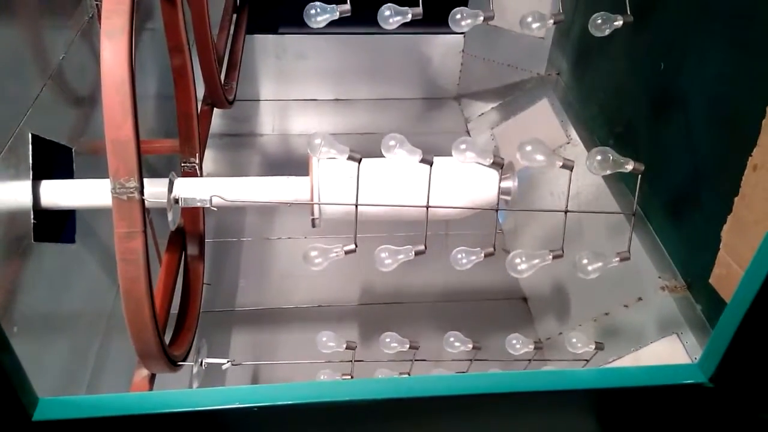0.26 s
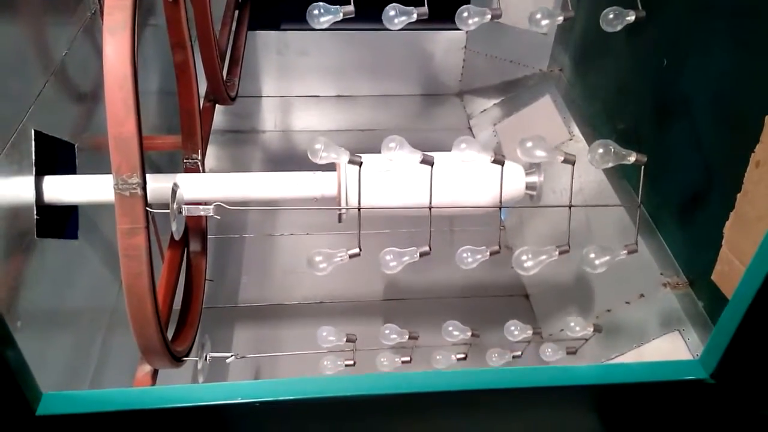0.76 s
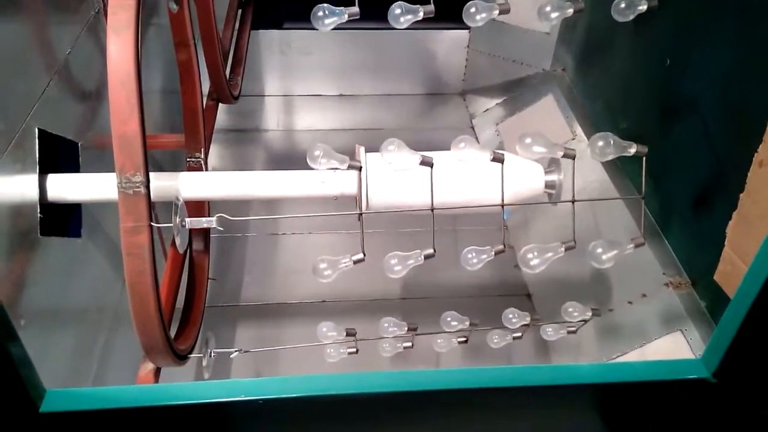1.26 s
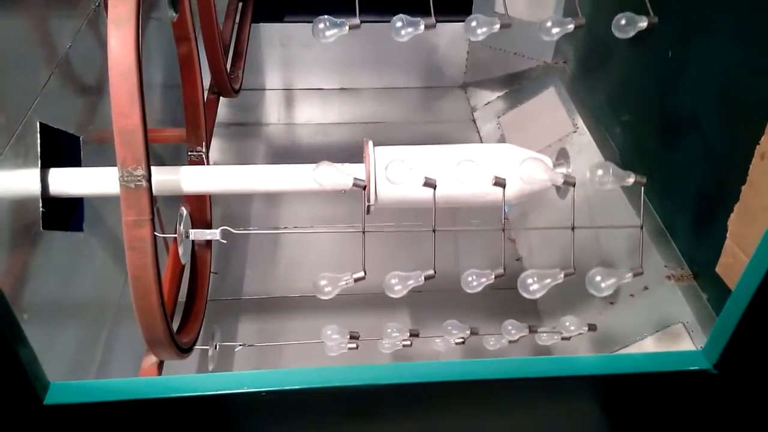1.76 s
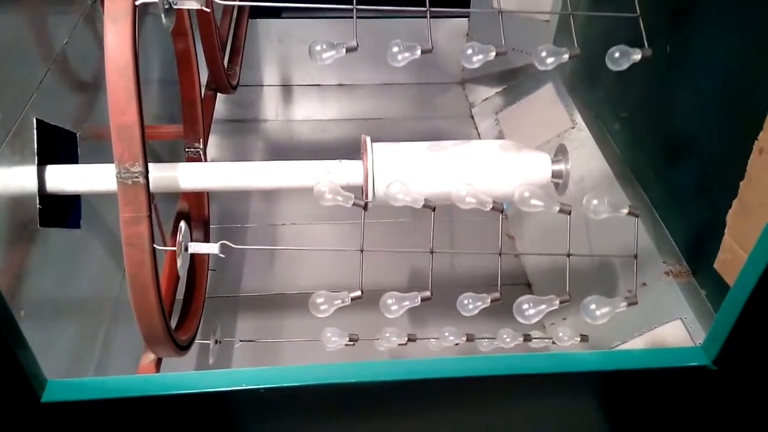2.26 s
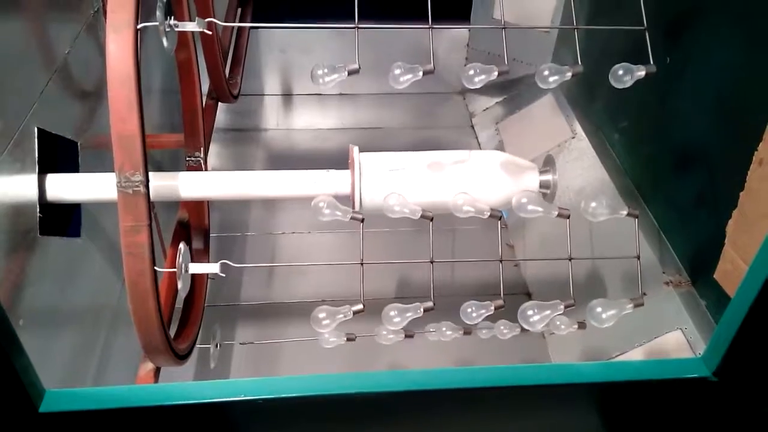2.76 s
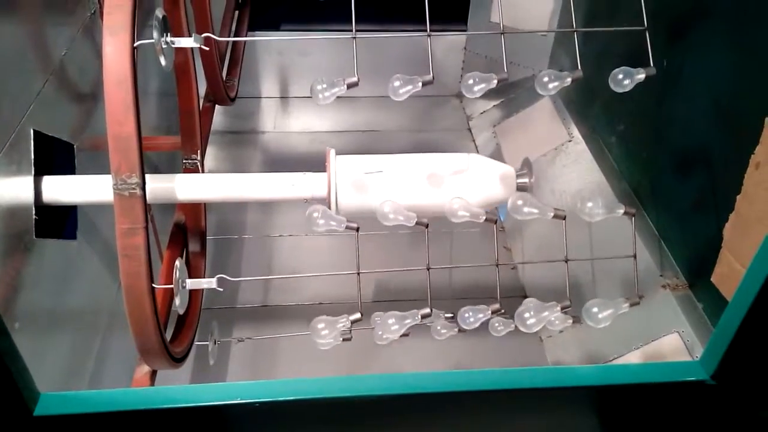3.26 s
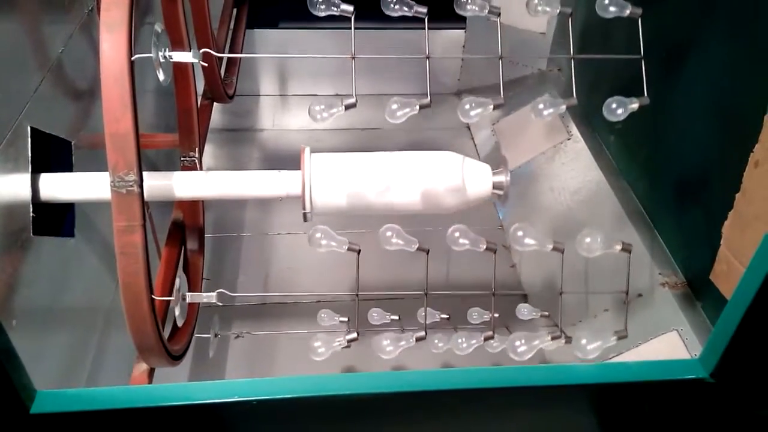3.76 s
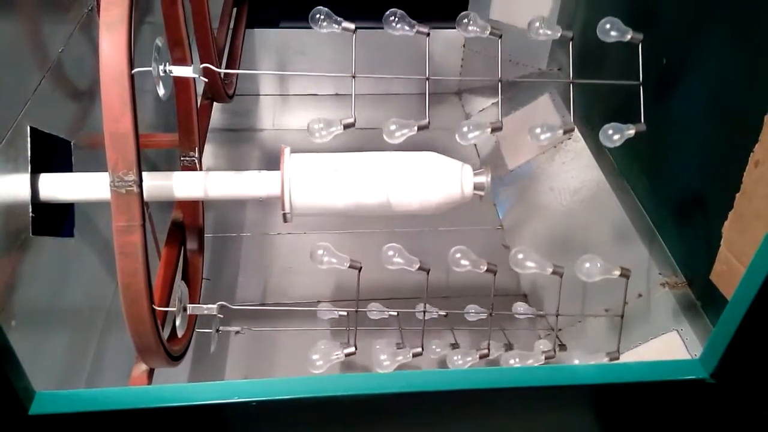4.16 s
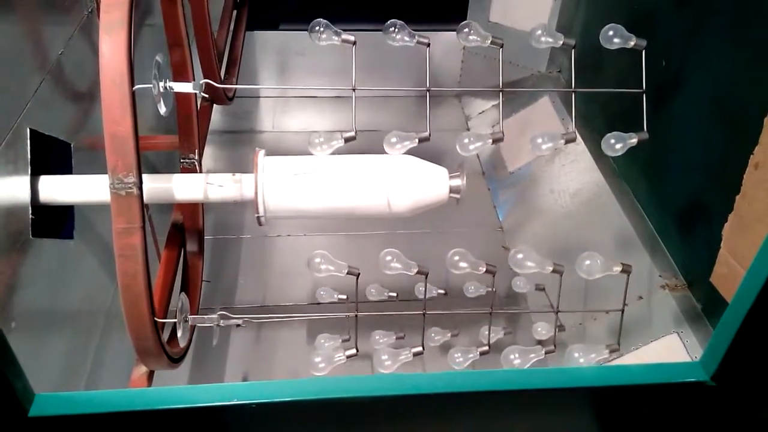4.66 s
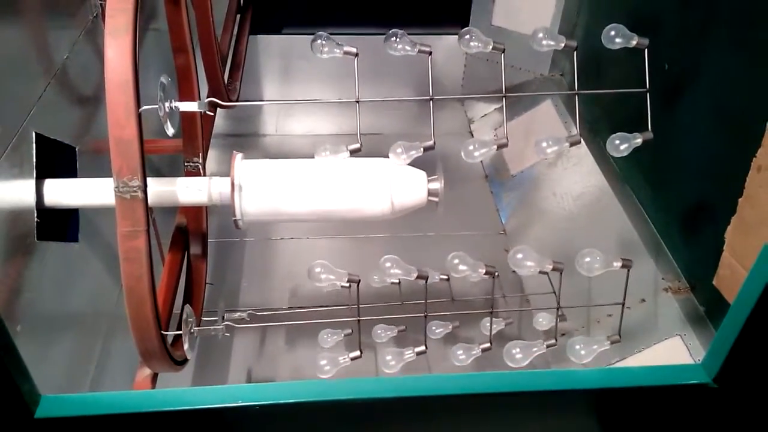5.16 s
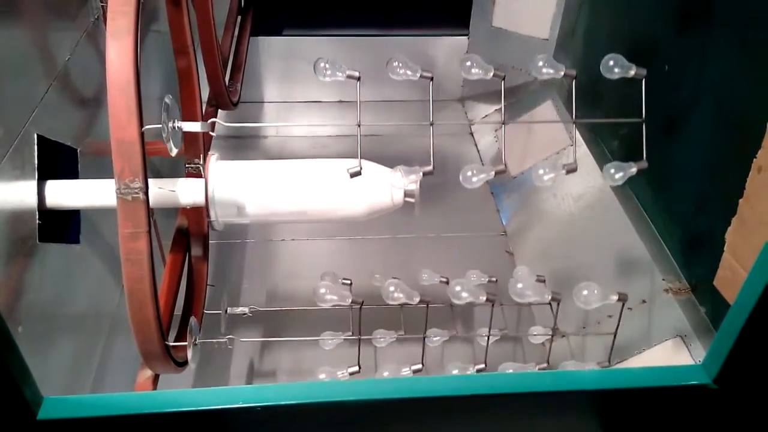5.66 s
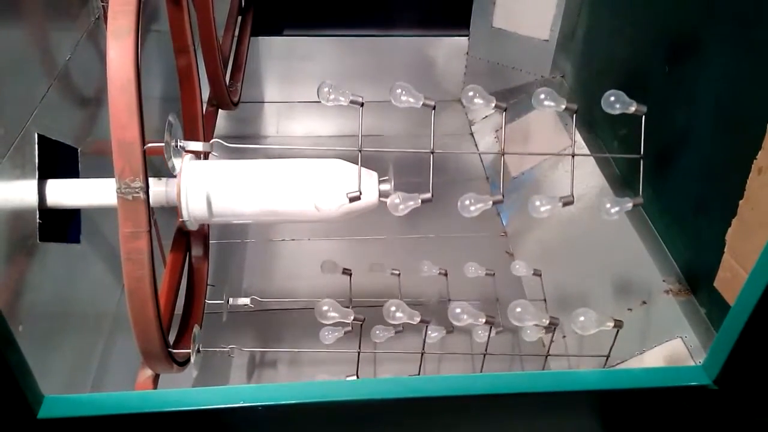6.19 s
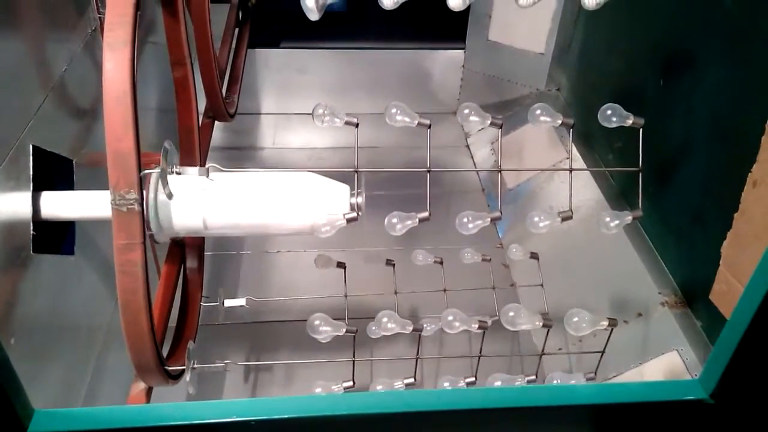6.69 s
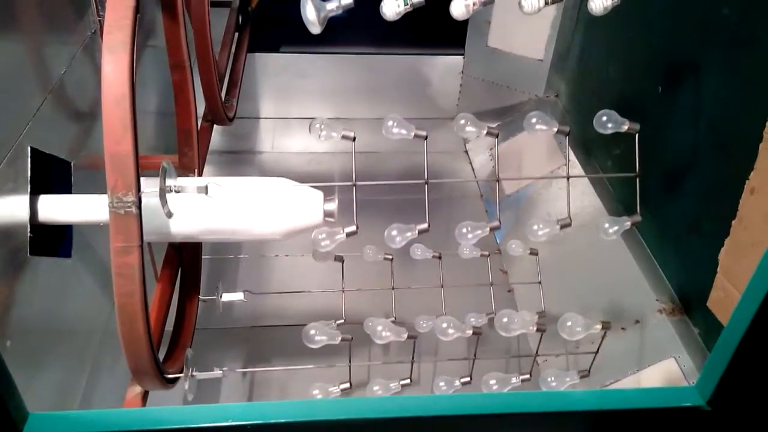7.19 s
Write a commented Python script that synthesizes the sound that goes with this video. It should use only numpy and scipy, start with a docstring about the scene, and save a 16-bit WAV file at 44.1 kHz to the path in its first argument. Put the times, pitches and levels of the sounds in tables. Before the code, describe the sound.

Heard from the opening of a metal paint booth, a dense hiss of spraying air blends with the broad rush and low, hollow drone of the extraction. A high motor whine with a fast flutter runs throughout, and above it the whistling tones of a spinning atomizer shimmer in and out. The noise stays even, with only the whine easing late on and then swelling to the finish.

```python
"""A rotary-bell paint atomizer runs in a sheet-steel spray booth. From the first instant its turbine
sings in high harmonics of the spin rate, a drive motor holds a beating whine, shaping air hisses in
the nozzles' resonances and extraction air rushes through the booth's low modes. Throughout, the
turbine's partials fade and return as reflections off the travelling head interfere with the direct
sound. Near 6 s the whine dips, then rises to its loudest at the end."""
import sys
import numpy as np
from scipy import signal
from scipy.fft import rfft, irfft, next_fast_len
from scipy.io import wavfile

SR = 44100
rng = np.random.default_rng(int(sys.argv[2]) if len(sys.argv) > 2 else 0)


def unload_wav(signal):
    """Save mono or channel-first audio to the path in sys.argv[1] as 16-bit WAV at rate SR, clipped to [-1, 1]."""
    wavfile.write(
        sys.argv[1],
        SR,
        np.round(np.clip(np.atleast_2d(signal).T, -1, 1) * 32767).astype(np.int16),
    )


N = 327663

# slow swell of the high and the low hiss about their means: (time [s], level [dB])
HIGH_HISS_SWELL = [(0.0, -0.1), (1.0, 0.5), (1.8, -0.1), (1.99, 0.7), (2.39, -0.7), (3.39, 0.2),
                   (3.79, -0.5), (4.19, 0.9), (4.39, -0.3), (4.59, 0.7), (4.99, 0.5), (5.19, -0.6),
                   (6.18, 0.1), (6.38, 0.9), (6.78, -0.7), (7.43, -0.3)]
LOW_HISS_SWELL = [(0.0, -1.0), (0.6, 0.1), (1.0, -0.5), (1.6, -0.5), (2.19, 0.3), (2.79, -0.4), (2.99, 0.7),
                  (3.79, -0.3), (4.59, 0.6), (5.39, -0.2), (5.78, 0.4), (7.43, -0.1)]


def from_db(db):
    """Amplitude ratio: tenfold for every 20 dB."""
    return 10 ** (np.asarray(db) / 20)


def in_time(rows):
    """Linear interpolation of (time [s], value) rows at every sample."""
    times, values = np.transpose(rows)
    return np.interp(np.arange(N) / SR, times, values)


def drift(rate):
    """Low-pass Gaussian noise of unit deviation, changing about `rate` times a second."""
    hop, settling_steps = 40, 2000
    pole = np.exp(-2 * np.pi * hop * rate / SR)
    white = rng.standard_normal(N // hop + settling_steps + 2)
    slow = signal.lfilter([1], [1, -2 * pole, pole * pole], white)[settling_steps:]
    return np.interp(np.arange(N) / hop, np.arange(len(slow)), slow / slow.std())


def noise(gain_at):
    """Spectral shaping: white noise takes on the amplitude per root hertz `gain_at(frequency)`."""
    size = next_fast_len(N)
    hz = np.maximum(np.fft.rfftfreq(size, 1 / SR), 1)
    spectrum = rfft(rng.standard_normal(size)) * gain_at(hz)
    return irfft(spectrum, size)[:N] * np.sqrt(SR / 2)


def fading_tone(cycles, echo_share, fades_per_s):
    """Interference: random reflections off moving parts shift the level and phase of a unit-rms sine."""
    echoes = echo_share * (drift(fades_per_s) + 1j * drift(fades_per_s)) / np.sqrt(2)
    direct = np.exp(2j * np.pi * (cycles + rng.random()))
    return np.sqrt(2 / (1 + echo_share ** 2)) * np.real((1 + echoes) * direct)


def turbine(riders_db=0.4, top_db=0.7, top_harmonic=26):
    """Periodic rotation radiates harmonics of one slightly unsteady spin rate; each fades on its own."""
    # speed of the turbine: (time [s], spin rate [turns/s])
    spin = [(0.0, 204.6), (1.2, 204.33), (2.8, 204.35), (3.2, 204.61), (4.0, 204.6), (4.4, 204.42),
            (5.2, 204.38), (5.6, 204.56), (6.4, 204.51), (7.1, 204.92)]
    # two loud partials that ride on the high hiss: (harmonic number, level [dB], swell [dB per dB])
    rider_partials = [(22, -34, 3), (23, -30.5, 4.5)]
    # highest loud partial, strongest while the head reaches furthest in: (time [s], level [dB])
    top_level = [(0.0, -37.7), (0.4, -29.5), (1.4, -27.7), (1.6, -36.1), (1.8, -25.4), (2.59, -30.4),
                 (3.19, -27.0), (3.59, -35.1), (3.79, -29.7), (3.99, -35.9), (4.59, -30.0), (7.43, -32.0)]
    # fainter partials: (harmonic number, level [dB])
    faint_partials = [(11, -41), (12, -36.5), (14, -48), (16, -46.5), (17, -46.5), (19, -35.5), (20, -43),
                      (21, -40), (25, -38), (28, -45), (29, -43), (30, -48), (31, -43), (33, -50),
                      (35, -57)]
    booth_echoes = dict(echo_share=0.6, fades_per_s=3.0)
    turns = np.cumsum(in_time(spin) + 0.04 * drift(4)) / SR
    hiss_db = in_time(HIGH_HISS_SWELL)
    riders = sum(from_db(riders_db + db + swell * hiss_db) * fading_tone(k * turns, **booth_echoes)
                 for k, db, swell in rider_partials)
    top = from_db(top_db + in_time(top_level)) * fading_tone(top_harmonic * turns, **booth_echoes)
    faint = sum(from_db(db) * fading_tone(k * turns, echo_share=0.7, fades_per_s=2.5)
                for k, db in faint_partials)
    return riders + top + faint


def motor(main_db=-0.2):
    """Close tones beat at their difference frequencies, chiefly about 15 and 30 Hz."""
    # the whine's two main tones: (frequency [Hz], relative level [dB])
    main_tones = [(1815.5, 0), (1830.3, -4.5)]
    # envelope of that pair: (time [s], level [dB])
    main_level = [(0.0, -31), (1.0, -31), (2.39, -30), (4.19, -30), (4.59, -29.5), (5.19, -29.8),
                  (5.98, -33), (6.78, -28), (7.43, -27)]
    # weaker tones: (frequency [Hz], level [dB])
    side_tones = [(773.8, -44.5), (1756.0, -36.5), (1785.7, -38), (1845.4, -42)]
    t = np.arange(N) / SR
    main = sum(from_db(db) * fading_tone(hz * t, echo_share=0.25, fades_per_s=2.0)
               for hz, db in main_tones)
    sides = sum(from_db(db) * fading_tone(hz * t, echo_share=0.44, fades_per_s=1.4)
                for hz, db in side_tones)
    return from_db(main_db + in_time(main_level)) * main + sides


def resonances(modes):
    """Broadband turbulence excites steep-sided resonances, whose powers add."""
    scale = 2 * np.sqrt(np.sqrt(2) - 1)  # makes each width a half-power bandwidth

    def gain_at(f):
        peaks = (from_db(db) / (1 + (scale * (f - hz) / width) ** 2) for hz, width, db in modes)
        return np.sqrt(sum(peak ** 2 for peak in peaks))
    return noise(gain_at)


def shaping_air(split_hz=3200, surge=0.99, waver_db=0.22, flutter_db=0.24):
    """Jet turbulence drives the nozzles' resonances; a low and a high band swell, waver and flutter."""
    # nozzle resonances: (frequency [Hz], bandwidth [Hz], spectral density level [dB])
    nozzle_modes = [(1735, 244, -53), (1990, 68, -49.5), (2274, 120, -53), (2286, 336, -48.5),
                    (2373, 50, -46), (3154, 6.3, -54.5), (3700, 20, -55), (3966, 450, -58.5),
                    (4626, 420, -49.5), (4924, 300, -49.5), (5206, 220, -52.5)]
    low = resonances([mode for mode in nozzle_modes if mode[0] < split_hz])
    high = resonances([mode for mode in nozzle_modes if mode[0] >= split_hz])
    hiss = np.zeros(N)
    for band, swell in ((low, LOW_HISS_SWELL), (high, HIGH_HISS_SWELL)):
        level_db = surge * in_time(swell) + waver_db * drift(3.3) + flutter_db * drift(25)
        hiss += band * from_db(level_db)
    return hiss


def extraction_air(rush_surge=0.4, drone_surge=1.7):
    """Turbulent flow makes a broad rush that follows the jet a little, and drives the booth's modes."""
    # rush of air: (frequency [Hz], spectral density level [dB])
    rush_spectrum = [(30, -115), (45, -84), (65, -67.5), (90, -65.5), (110, -61.5), (290, -54), (480, -60),
                     (800, -56.5), (1020, -57.5), (1400, -53.5), (3300, -60.5), (5600, -60.5), (6780, -62),
                     (7400, -87)]
    # booth and duct resonances: (frequency [Hz], bandwidth [Hz], spectral density level [dB])
    booth_modes = [(106, 8.9, -58.5), (126.2, 7.1, -54.5), (163, 5.8, -55.5), (175, 7.6, -53.5),
                   (200.3, 7, -55.5), (252.4, 18, -53), (340.4, 12, -53), (376, 12, -54), (409.7, 10, -55),
                   (435.6, 6.5, -57.5), (516.8, 6.7, -53.5), (550, 4.1, -55.5), (614, 8, -59.5),
                   (829, 12, -55)]
    # swell of their hollow drone, before scaling by drone_surge: (time [s], level [dB])
    drone_swell = [(0.0, 0.5), (1.0, 0), (1.8, 1.8), (2.99, -1.8), (3.39, 1.3), (3.79, -0.5), (4.19, 0.8),
                   (4.99, -1.3), (5.19, 0.5), (7.43, 0.6)]
    jet_db = (in_time(LOW_HISS_SWELL) + in_time(HIGH_HISS_SWELL)) / 2
    hz, db = np.transpose(rush_spectrum)
    rush = noise(lambda f: from_db(np.interp(np.log(f), np.log(hz), db)))
    drone = resonances(booth_modes) * from_db(drone_surge * in_time(drone_swell))
    return rush * from_db(rush_surge * jet_db) + drone


def scene():
    """Superposition: four continuous sources add at the booth's opening."""
    return (turbine() + motor() + shaping_air() + extraction_air())[None]


def record(dry, low_hz=42, high_hz=7400):
    """Band limiting: the deep bass rolls off and the top is cut steeply."""
    high_pass = signal.butter(4, low_hz, "high", fs=SR, output="sos")
    low_pass = signal.ellip(14, 0.1, 90, high_hz, fs=SR, output="sos")
    return signal.sosfilt(low_pass, signal.sosfilt(high_pass, dry))


dry = scene()
out = record(dry)
unload_wav(out)
```